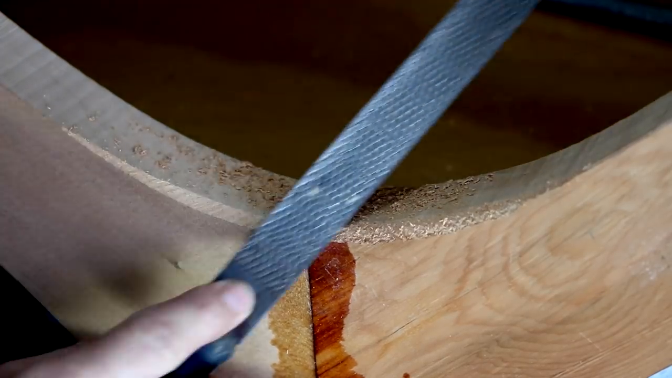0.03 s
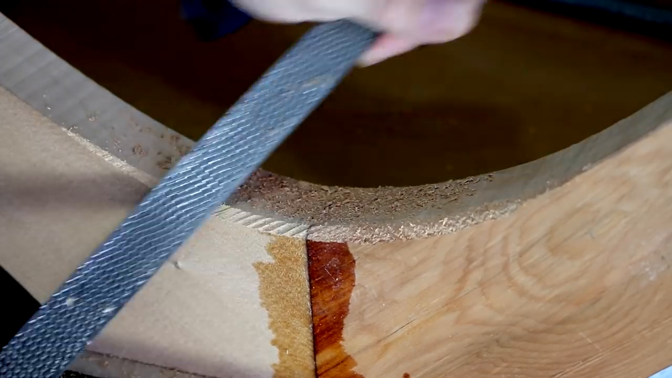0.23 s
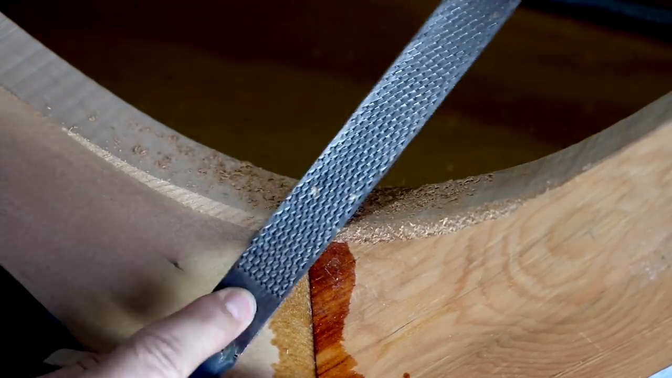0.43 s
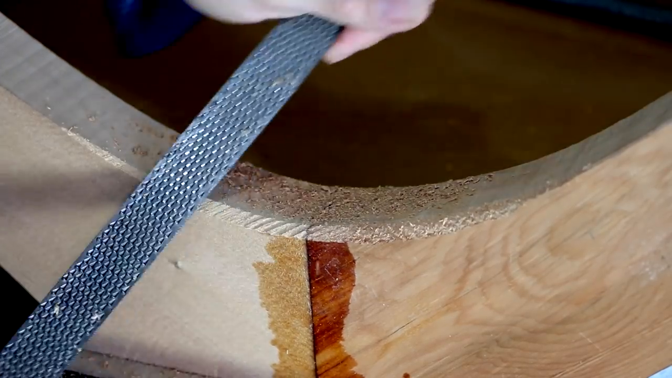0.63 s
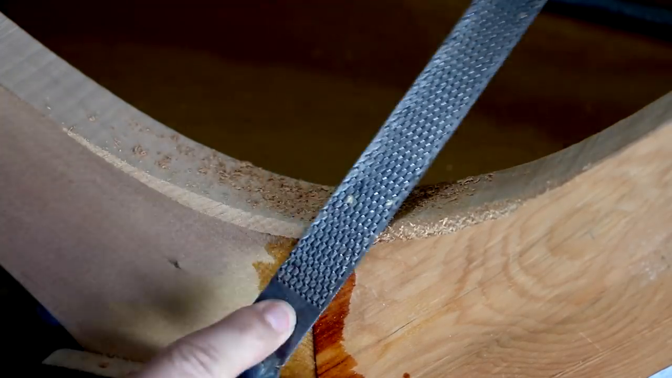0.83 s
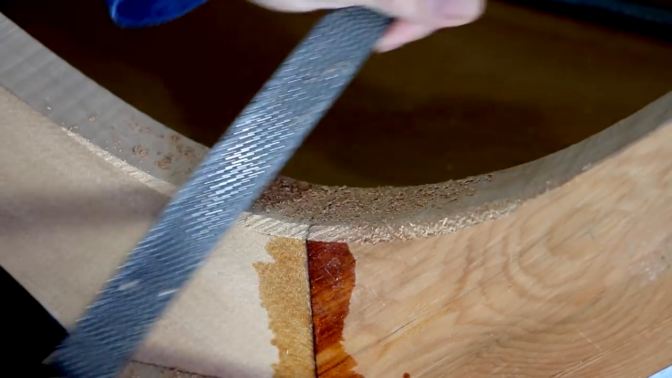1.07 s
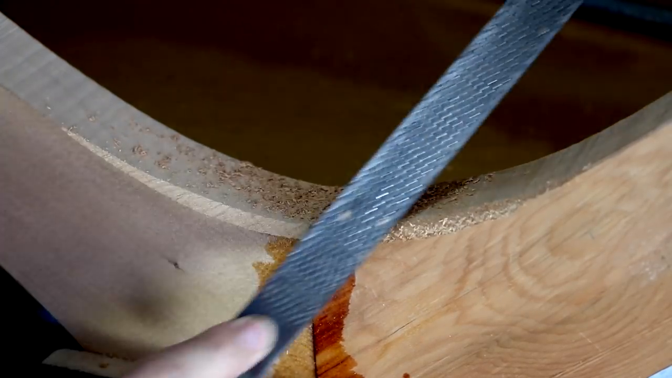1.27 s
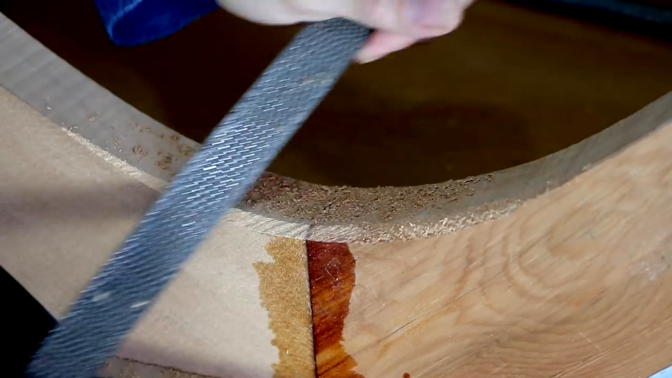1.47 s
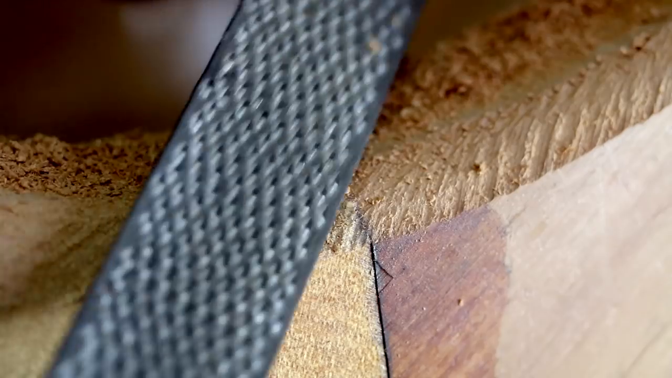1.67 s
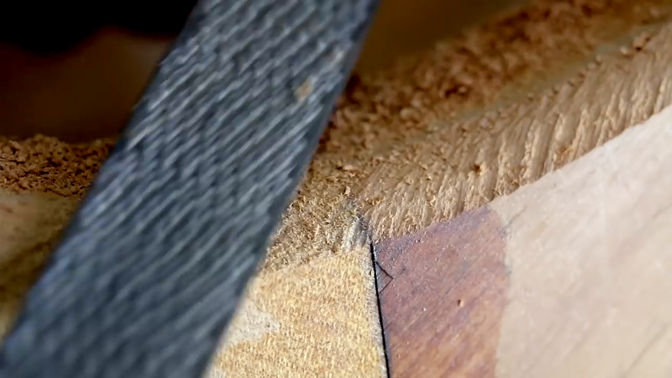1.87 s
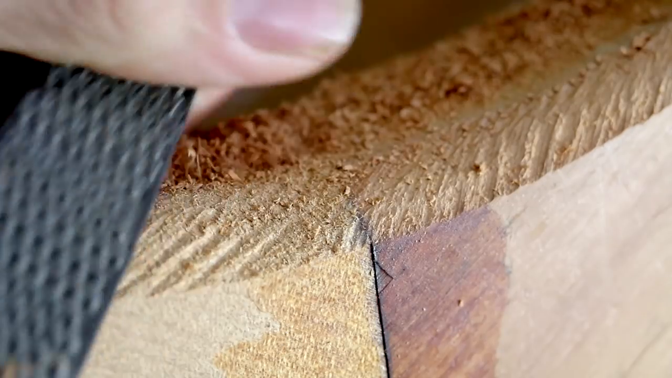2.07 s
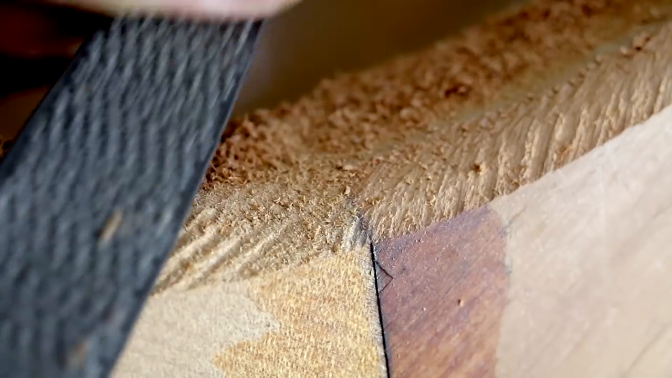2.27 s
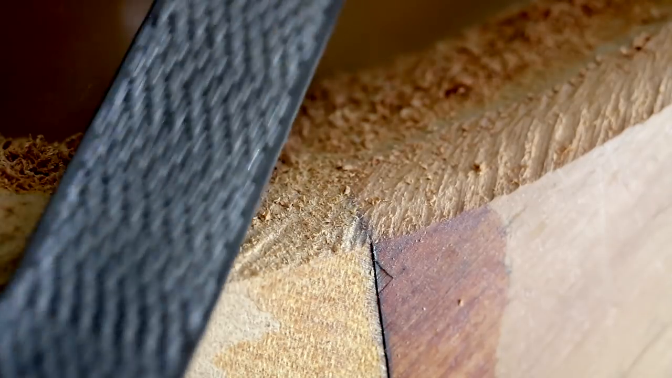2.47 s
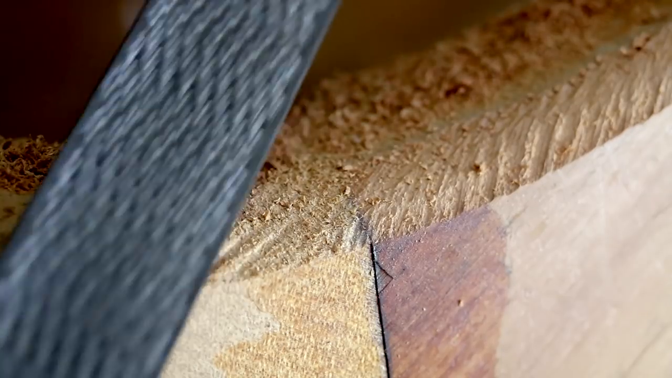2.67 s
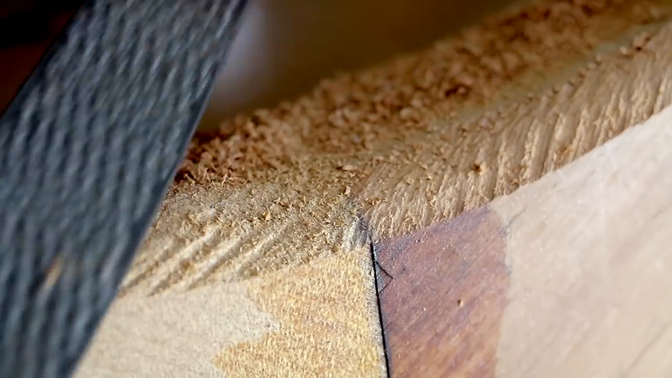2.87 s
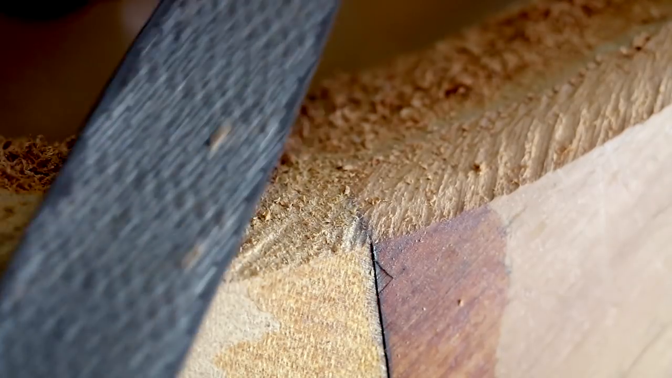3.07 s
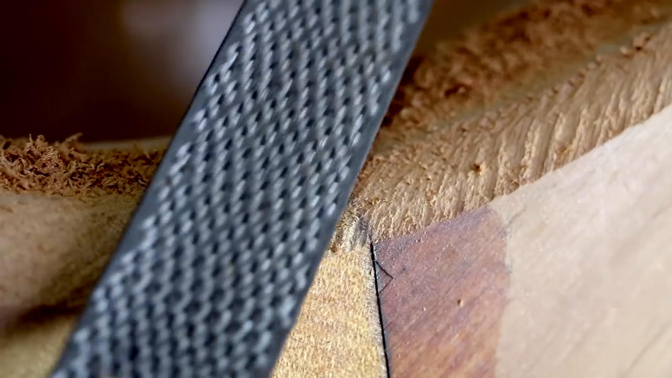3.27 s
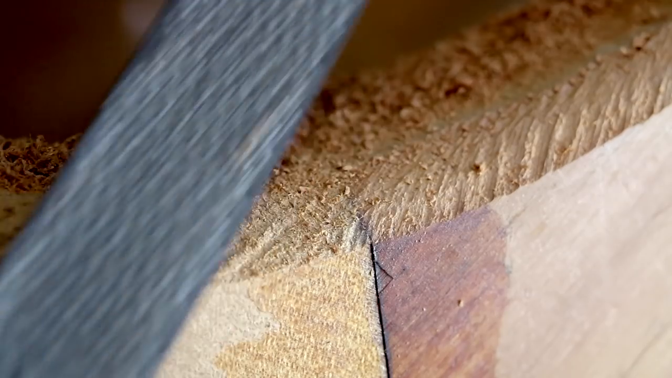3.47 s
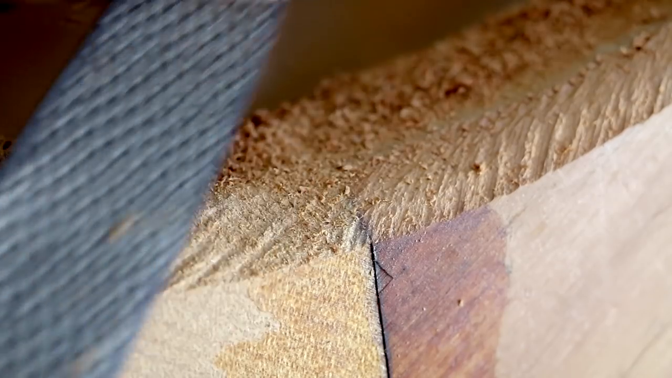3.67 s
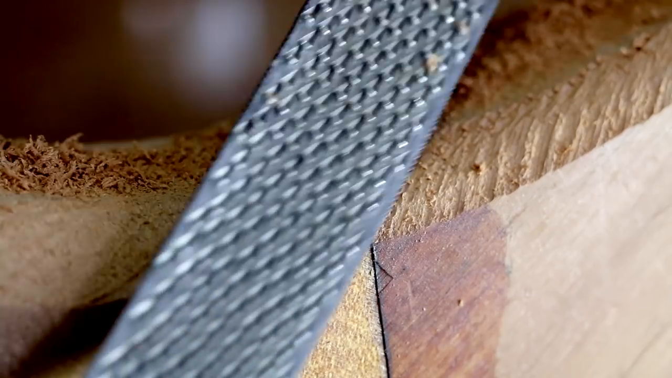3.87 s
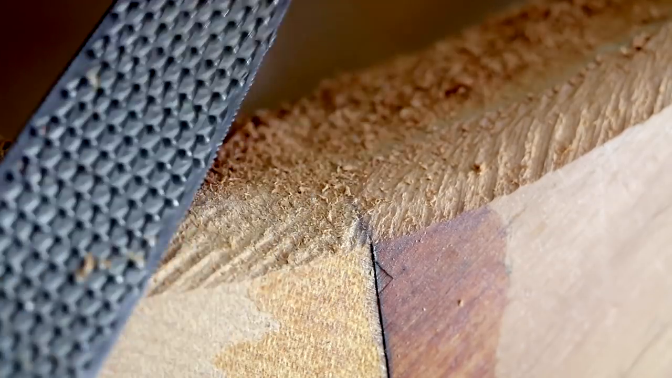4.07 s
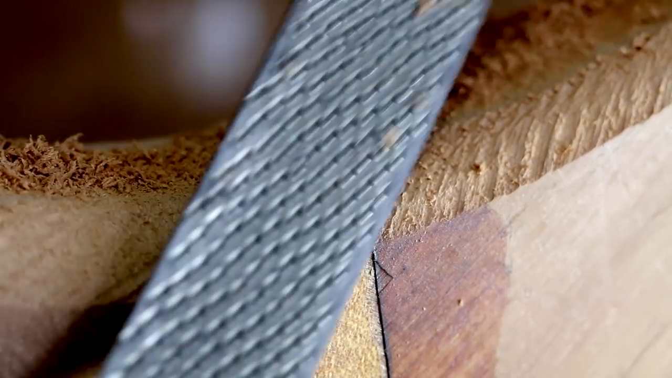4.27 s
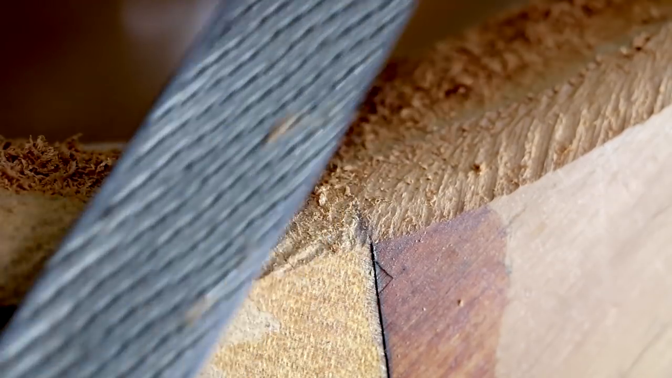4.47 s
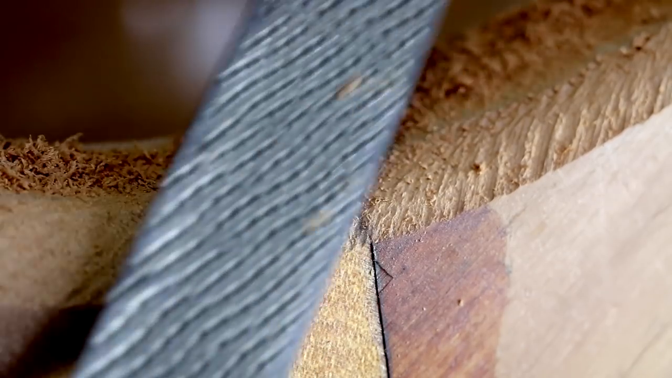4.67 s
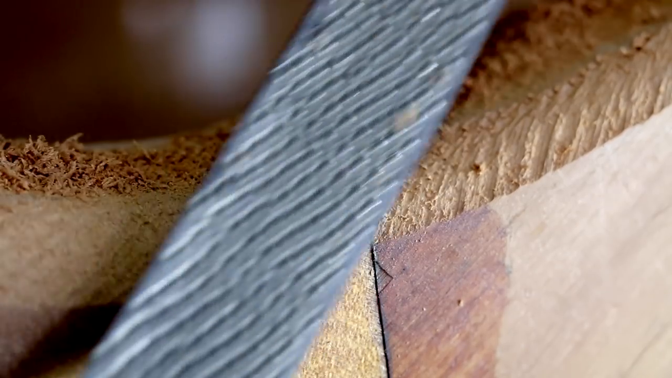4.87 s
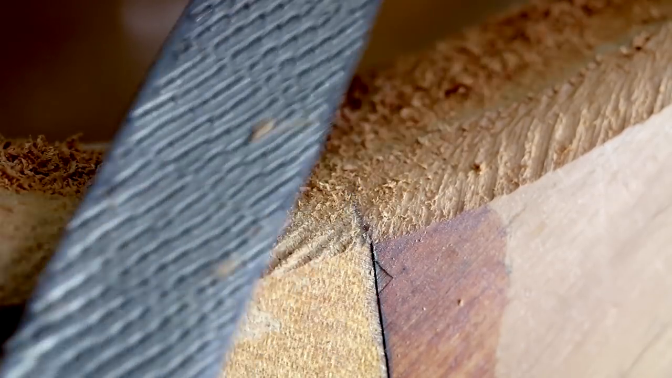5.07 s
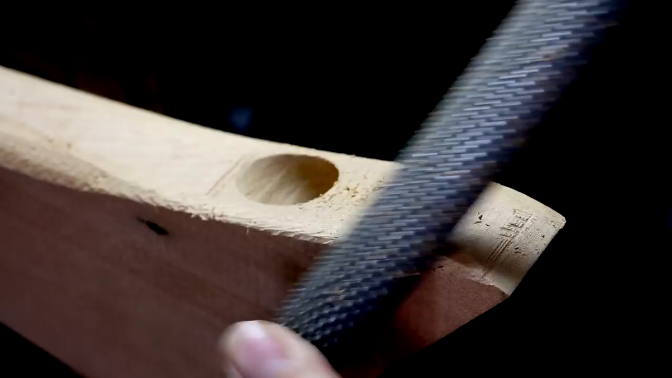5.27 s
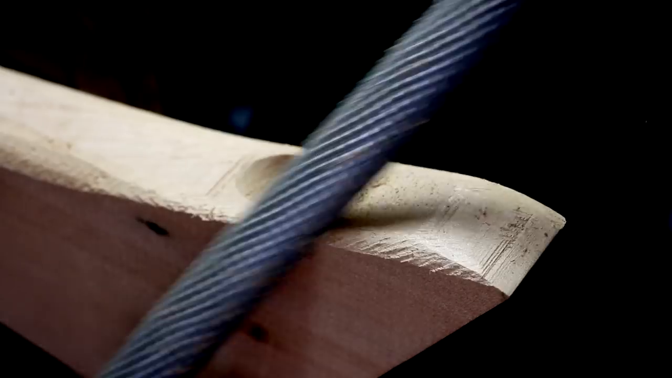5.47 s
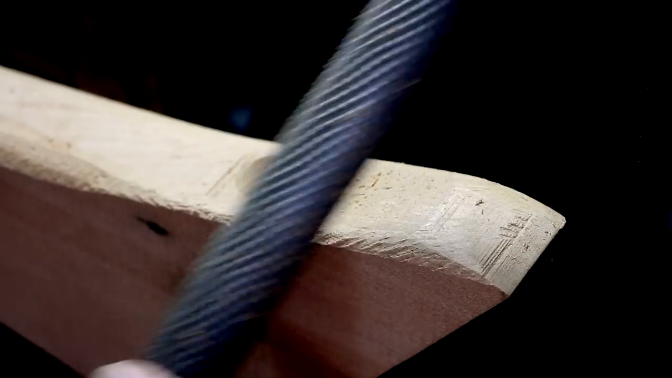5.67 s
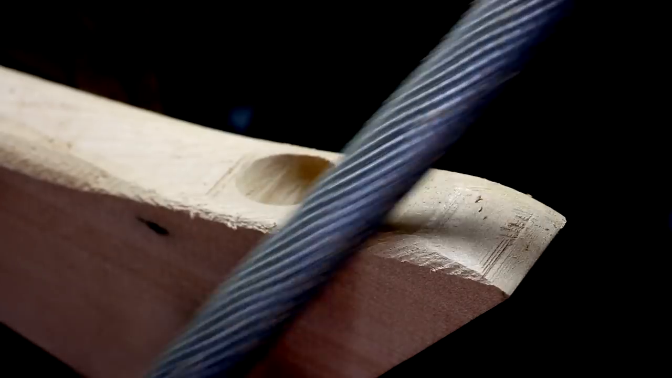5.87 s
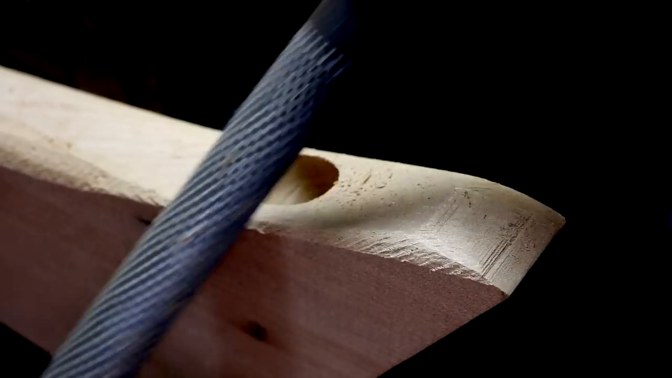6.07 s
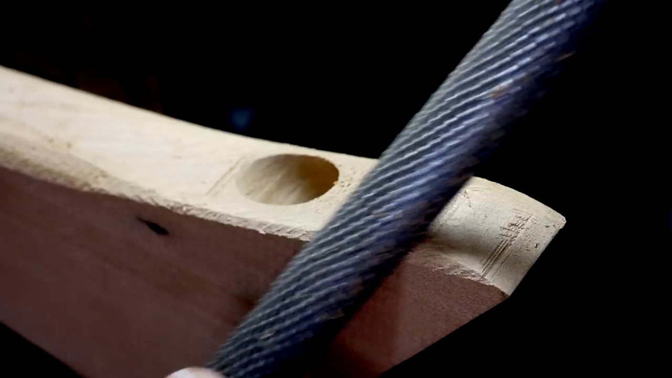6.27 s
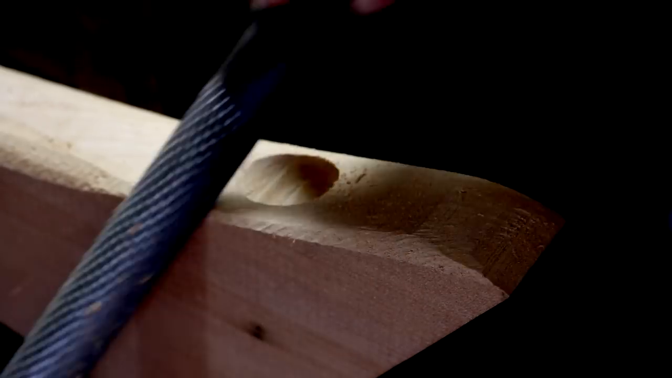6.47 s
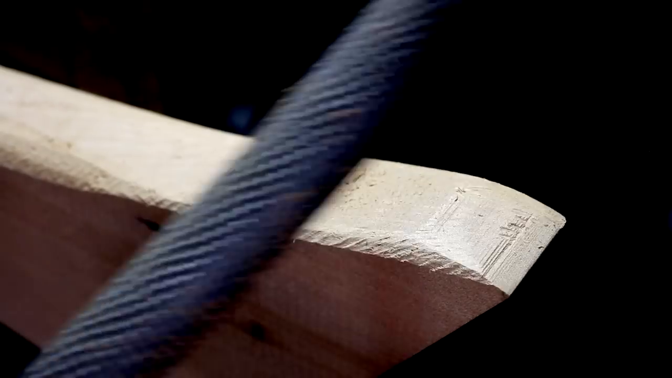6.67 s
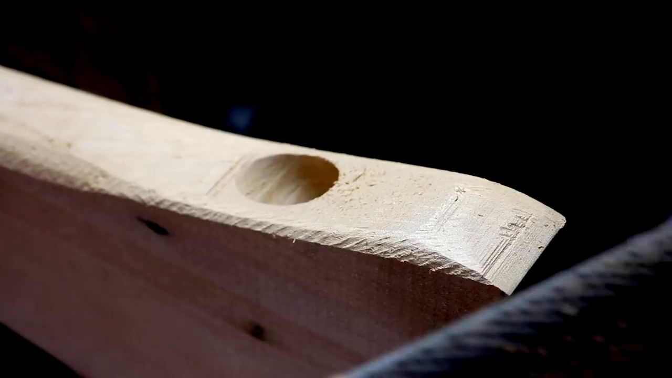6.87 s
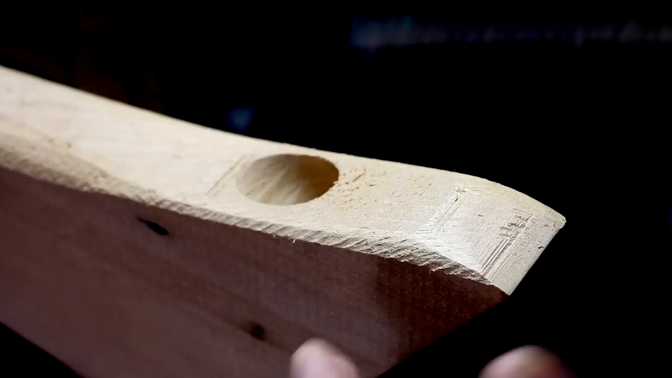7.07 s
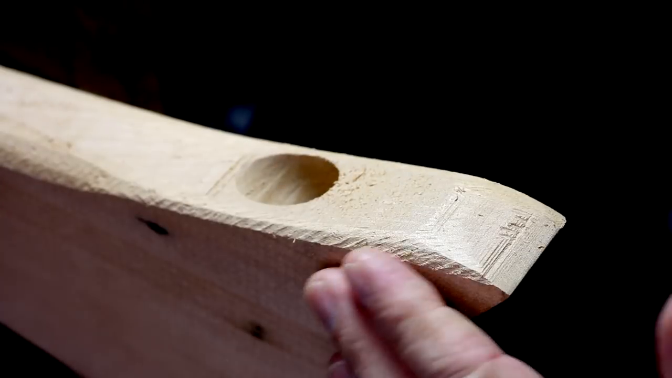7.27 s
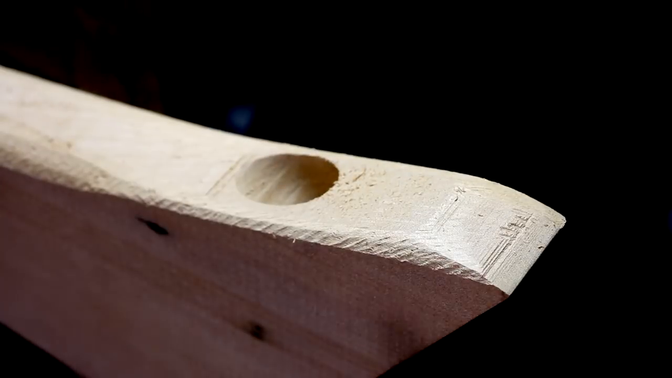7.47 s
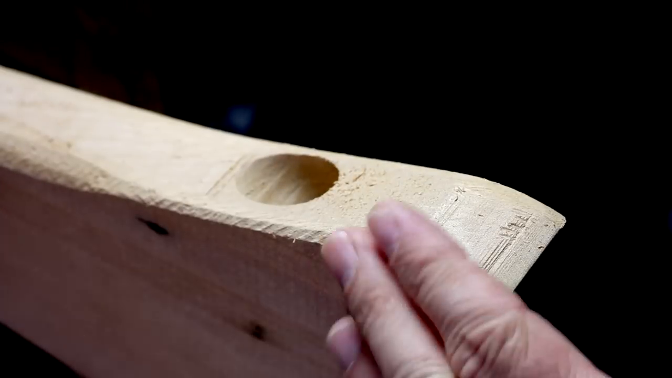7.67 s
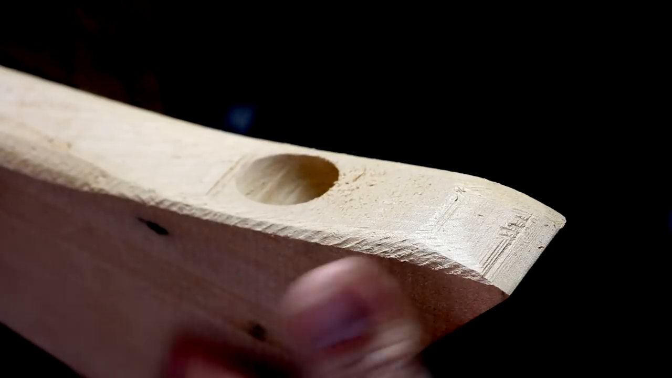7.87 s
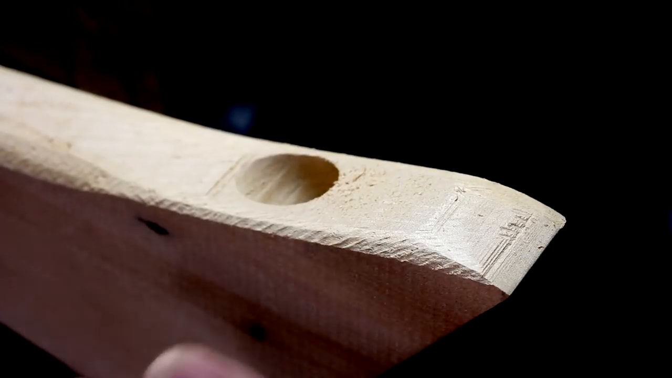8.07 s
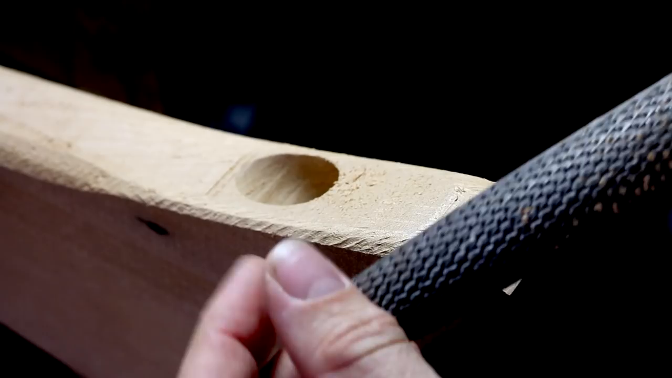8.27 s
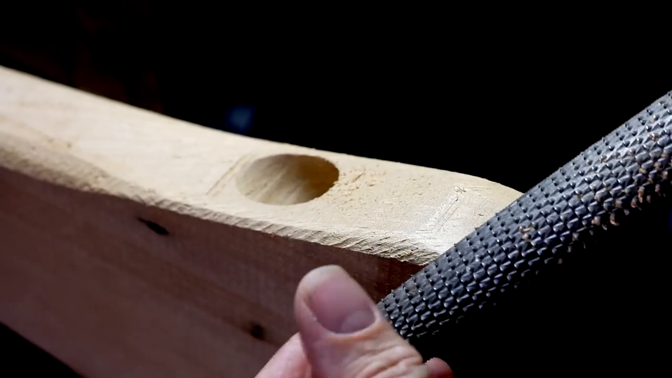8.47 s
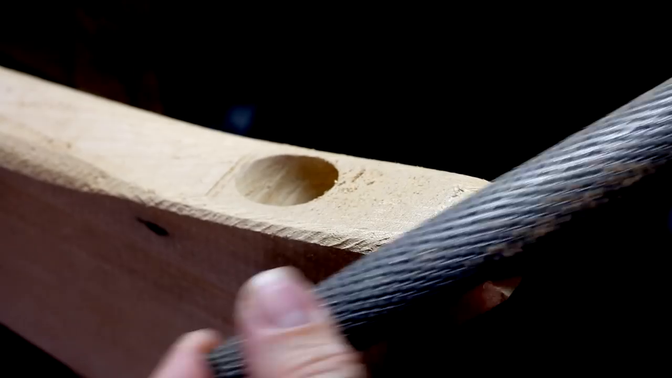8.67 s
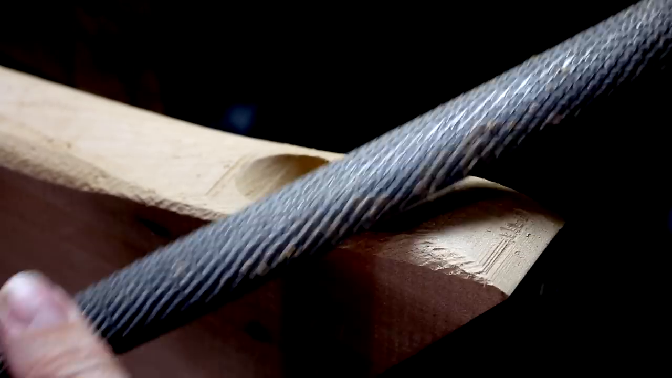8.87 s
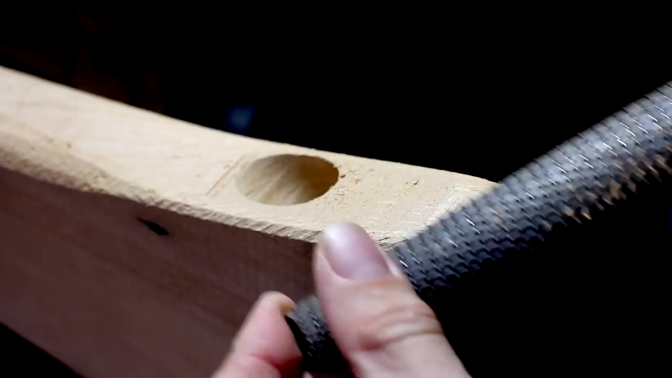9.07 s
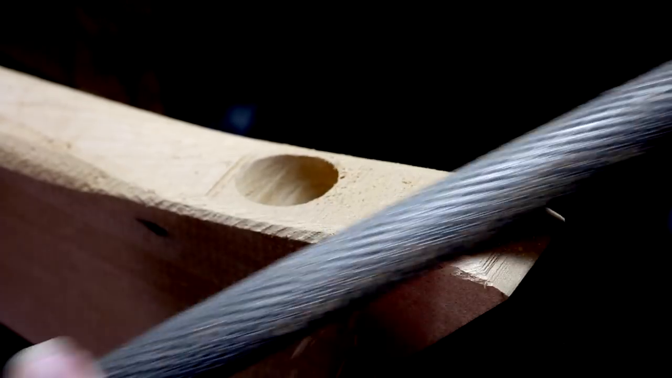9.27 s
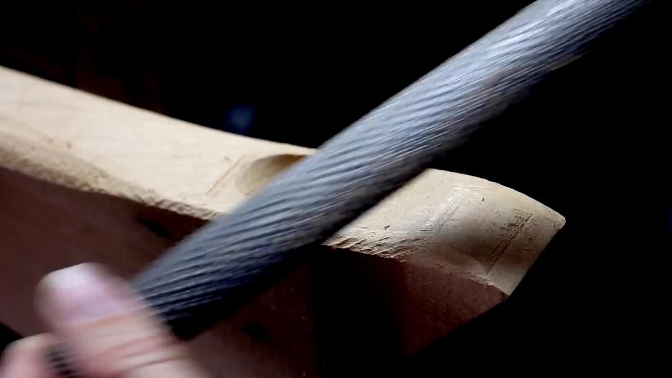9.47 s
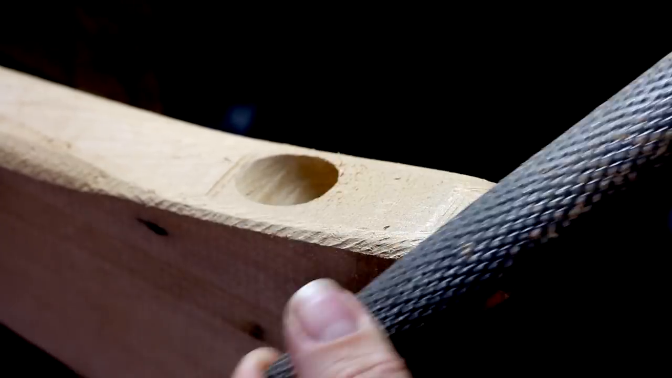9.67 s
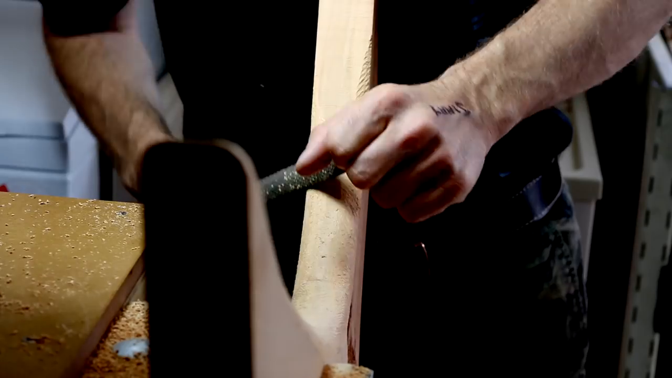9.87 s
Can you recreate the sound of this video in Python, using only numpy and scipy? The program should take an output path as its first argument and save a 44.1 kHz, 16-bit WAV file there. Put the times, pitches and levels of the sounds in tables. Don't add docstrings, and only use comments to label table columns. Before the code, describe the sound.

Dense, uneven scratching of metal teeth on wood, heard by a near camera microphone with faint hiss and a short dull room echo. Brisk back-and-forth strokes come first, with hollow bench rumble underneath, then rougher close ones. Three spaced pushes follow with knocks before them. Fingers brush dust away twice, quietly; two more deep strokes follow, and an abrupt rough scrape ends it.

```python
import sys
import numpy as np
from scipy import signal
from scipy.fft import rfft, irfft, next_fast_len
from scipy.io import wavfile
from scipy.ndimage import uniform_filter1d

SR = 44100
rng = np.random.default_rng(int(sys.argv[2]) if len(sys.argv) > 2 else 0)


def bounce(signal):
    frames = np.transpose(np.atleast_2d(signal))
    limited = np.clip(frames, -1, 1)
    pcm = np.round(limited * 32767).astype(np.int16)
    wavfile.write(sys.argv[1], SR, pcm)


def boost(x):
    u = np.asarray(x, float) / 20
    return 10 ** u


N = 438354

CUTS_S = [0, 1.594, 5.318, 8.45, 9.794, 9.95]
# top_s, swell_20db_s, fade_20db_s, blade_db, bench_above_blade_db
FAR_STROKES = [
    (0.135, 0.123, 0.109, -14.8, -21.2),
    (0.319, 0.097, 0.113, -27.5, -16.2),
    (0.521, 0.126, 0.118, -15.8, -16.7),
    (0.684, 0.074, 0.139, -26.4, -12.8),
    (0.892, 0.109, 0.125, -16.2, -12.5),
    (1.094, 0.103, 0.124, -26.5, -12.2),
    (1.29, 0.104, 0.132, -17.3, -17.1),
    (1.495, 0.076, 0.159, -28.0, -11.6),
]
CLOSE_STROKES = [(1.76, .24, .1, -25, -11), (2.03, .262, .414, -43.1, -9), (2.145, .104, .036, -33.6, -19),
                 (2.58, .254, .131, -21.7, -7), (2.929, .206, .148, -34.9, -17),
                 (3.28, .179, .158, -22.5, -9), (3.658, .195, .114, -34, -17),
                 (3.892, .133, .091, -20.9, -12), (4.114, .156, .129, -35.3, -17),
                 (4.343, .117, .146, -25.5, -10), (4.608, .129, .082, -37, -15),
                 (4.823, .124, .139, -27.1, -12), (5.079, .107, .067, -36.9, -18),
                 (5.283, .129, .26, -26.1, -9)]
# top_s, swell_20db_s, fade_20db_s,
# blade_db, bench_above_blade_db
EDGE_STROKES = [
    (5.32, 0.06, 0.19, -43, 0),
    (5.42, 0.011, 0.034, -32, 8),
    (5.598, 0.14, 0.15, -16, -1),
    (5.9, 0.0075, 0.064, -35.5, 5),
    (6.054, 0.14, 0.15, -15, -6.5),
    (6.34, .006, 0.11, -40, 14),
    (6.517, 0.13, 0.18, -17, -7.5),
]
TIP_STROKES = [
    (8.57, .006, .25, -41, 11),
    (8.895, .185, .16, -18.5, 8.5),
    (9.245, .006, .12, -36, 11),
    (9.44, .178, .15, -17, 3),
    (9.76, .006, .15, -33, 11),
]
UPRIGHT_STROKES = [
    (9.804, .3, 0.18, -17.5, -14.5),
    (9.924, 0.045, .4, -25.5, -6.5),
]
# mode_hz, width_hz, level_db
FAR_MODES = [(79, 15.5, -10), (130.6, 16, -9), (287, 38, -12), (483, 18, 1.5), (975, 36, -4),
             (1034, 180, -8.5), (1317, 147, -7), (1570, 90, -8), (2049, 62, -6), (3004, 180, -17),
             (3108, 240, -17.5), (3840, 490, -22.5), (4560, 67, -27)]
CLOSE_MODES = [(119.4, 3.2, 0), (262.3, 3.6, -8.5), (275, 16, -11), (477, 24, 2.5), (676, 18.5, -6.5),
               (968, 113, -4.5), (1337, 61, -7), (1568.5, 76, 1.5), (2054, 78, -8), (2980, 130, -15.5),
               (3914, 306, -13), (5830, 450, -37), (6480, 670, -35), (7110, 350, -28), (8000, 170, -32.5),
               (8300, 150, -46), (9000, 300, -35), (10370, 840, -35.5), (10570, 270, -42)]
EDGE_MODES = [(82.6, 15, -9.5), (126, 20, -1.5), (248, 19, -2.5), (277, 27, -17), (465, 30, -15.5),
              (715, 59, -18.5), (1124, 88, -19.5), (1738, 200, -19.5), (2296, 47, -24), (2526, 110, -23),
              (3270, 350, -26), (4120, 160, -30.5), (4660, 140, -32.5), (6270, 350, -32.5)]
TIP_MODES = [(81, 38, -12.5), (122.9, 7.1, 7), (253, 20, -18.5), (340, 14, -21), (746, 51, -29),
             (1105, 95, -24), (1696, 95, -15), (2460, 170, -35), (3200, 180, -35), (3810, 400, -33.5),
             (6470, 540, -37)]
UPRIGHT_MODES = [(560, 55, -16), (975, 190, 2.5), (1220, 160, 3.5), (1990, 230, -9), (2970, 980, -16.5),
                 (3970, 250, -13)]
# freq_hz, density_db_per_hz
FAR_WOOD = [(40, -30), (70, -13), (400, -20), (800, -10), (2100, -8), (2500, -21), (4300, -27),
            (5300, -29.5), (7700, -34.5), (8300, -38.5), (15500, -46.5)]
CLOSE_WOOD = [(40, -16.5), (70, -19.5), (345, -14), (730, -4.5), (1700, -8), (2400, -12), (4400, -27),
              (5200, -26.5), (7300, -28), (8100, -36), (15500, -34)]
EDGE_WOOD = [(40, -24), (70, 2), (250, -9), (600, -17), (2600, -19.5), (3000, -29), (5000, -27.5),
             (5400, -34), (7100, -32.5), (7600, -36.5), (15500, -39)]
TIP_WOOD = [(40, -20), (100, -7), (250, -12), (600, -17), (2600, -16.5), (3000, -24), (4400, -26.5),
            (5300, -29.5), (7000, -23), (7500, -35), (15500, -37.5)]
UPRIGHT_WOOD = [(40, -16), (90, -2), (283, -11), (1400, 6), (1600, -5), (4200, -14.5), (5000, -16),
                (15500, -37)]
# small_modes_db, hiss_db
SETUPS = [
    (-6, -47),
    (-8.5, -48),
    (-5, -50.5),
    (-12, -49),
    (-6, -49),
]
CEILINGS = [
    .56,
    .6,
    1.0,
    1.05,
    .6,
]
ARMS = [
    (2.7, 1.3),
    (3.7, 1.6),
    (2, 1),
    (2.8, 1),
    (1.5, 1),
]
HAND = (2.6, 1)
# above_blade_db, swing_share, late_s, top_flatness
FOLLOW = [
    [(1.1, 0.56, 0.041, .9), (-5, 0.82, -0.0059, 0.92), (-17.5, 1.0, -0.000081, 0.72)],
    [(.6, 0.87, 0.028, 0.57), (-2.5, .9, -0.012, 1.53), (-21, 1, -0.0073, .9)],
    [(3, 0.81, 0.023, 1.14), (-2.5, 0.84, 0.0091, 1.15), (-15.5, 1.16, 0.007, 1.16)],
    [(1, 1.15, .003, .7), (-1.5, .92, .002, .9), (-16, 1.3, .001, 1)],
    [(-3.5, 0.81, .005, .95), (-10.5, 0.43, .005, 0.54), (-22, 1.4, 0.0013, 1)],
]
# above_drag_db, swing_share, late_s, top_flatness
DUST = (0.74, 1.56, 0.01, 0.68)
# start_s,
# peak_db, pitch_hz, width_hz
TICKS = [(0.372, -27, 9000, 12000), (2.17, -34, 9000, 9000), (2.19, -31, 9000, 9000),
         (2.21, -37.5, 469, 19), (2.303, -27.5, 457, 40), (2.33, -21, 455, 44), (2.58, -15.5, 479, 47),
         (2.61, -12.5, 480, 50), (3.088, -31, 472, 48), (3.107, -26, 481, 40), (3.519, -30, 1570, 300),
         (4.712, -30, 1570, 280), (5.166, -25, 477, 52), (5.67, -35, 465, 7.5), (6.14, -33, 465, 12),
         (6.489, -9.5, 253, 8.5), (6.599, -28.5, 465, 7.4), (9.441, -18, 1716, 11.3),
         (9.501, -35.5, 465, 8.2), (7.154, -40, 2800, 1200), (7.226, -32, 6000, 14000),
         (7.323, -36, 1990, 1800), (7.662, -31.5, 4500, 5200), (9.7934, -15, 9000, 20000)]
# start_s, peak_db, contact_ms
KNOCKS = [
    (5.408, -8.5, 0.6),
    (5.887, -13, 0.82),
    (6.328, -13.5, 0.55),
    (8.553, -15.5, 0.78),
    (9.233, -19.5, 1),
    (9.746, -23.5, 1),
]
# mode_hz, level_db, t60_s
LANDING = [(81.5, -4, 0.31), (113.4, -17, 0.52), (195, -2, 0.072), (258.6, 1.5, 0.14), (322.4, 2.5, 0.094),
           (452, 2.5, 0.06), (636, 2, 0.042), (740, -5, 0.4), (863, -1.5, 0.037), (1066, 12.5, 0.0096),
           (1674, 14, 0.018), (2360, -14.5, .03), (3300, -20, .1)]
# top_s, swell_20db_s, fade_20db_s, drag_db, dust_above_drag_db
WIPES = [
    (6.9, .2, .25, -61, 3),
    (7.379, .107, .219, -52.5, -3),
    (7.51, .125, .119, -44, 5),
    (8.002, .204, .16, -44, 5),
    (8.2, .1, .5, -62, 0),
]
# freq_hz, density_db_per_hz
SKIN = [(180, -61.5), (300, -29), (455, -0.5), (762, -11), (1750, 1), (3580, 7.5), (16000, 4)]
# freq_hz, density_db_per_hz
SHOP = [(12, -36.5), (20, -1.5), (74, 11), (216, -9), (347, -3), (388, -9), (678, -15.5), (949, -11.5),
        (1610, -17), (7110, -24.5), (16000, -26)]

BENCH_HZ, LEG_HZ, BLADE_HZ, TOP_HZ = 180, 600, 5000, 16500
SHOP_T60_S, ECHO_DB = 0.11, -15


def unit(x):
    return x / np.sqrt(np.mean(x ** 2))


def colour(x, response):
    size = next_fast_len(len(x) + SR // 2)
    f = np.fft.rfftfreq(size, 1 / SR) + 0.0011
    return irfft(rfft(x, size) * response(f), size)[:len(x)]


def smooth(points):
    hz, db = np.transpose(points)
    return lambda f: boost(np.interp(np.log(f), np.log(hz), db))


def ringing(modes, order=1):
    def response(f):
        total = 0
        for k, (hz, width_hz, db) in enumerate(modes):
            damping = 1j * f * width_hz
            total = total + (-1) ** k * boost(db) * (damping / (hz ** 2 - f ** 2 + damping)) ** order
        return total
    return response


def between(low_hz, high_hz):
    return lambda f: 1 / (1 + (f / high_hz) ** 8) - 1 / (1 + (f / low_hz) ** 8)


def walk(size, rate):
    hold = int(SR / rate)
    levels = np.repeat(rng.standard_normal(size // hold + 1), hold)
    slewed = uniform_filter1d(uniform_filter1d(levels, hold), hold)
    return unit(slewed[:size])


def add(track, s, sound, peak_db):
    i = int(s * SR)
    track[i:i + len(sound)] += (sound * boost(peak_db) / np.abs(sound).max())[:N - i]


def bites(size, rate, spread_db, chatter_db, chatter_rate):
    hit = rng.random(size) < rate / SR
    force = np.minimum(rng.exponential(size=size), 4)
    sign = rng.standard_normal(size)
    chatter = boost(chatter_db * walk(size, chatter_rate))
    return unit(hit * boost(spread_db * force) * sign * chatter)


def played(t, strokes, arm, above_db=0, swing=1, late_s=0, flat=1, own=False):
    power, coarse = 0, t[::32]
    for s, swell_s, fade_s, db, own_db in strokes:
        away = coarse - s - late_s
        span_s = np.where(away < 0, swell_s, fade_s)
        curve = flat * np.where(away < 0, *arm)
        drop_db = 20 * np.abs(away / span_s) ** curve
        power = power + boost(db + above_db + own * own_db - swing * drop_db) ** 2
    return np.interp(t, coarse, np.sqrt(power))


def room_tone():
    return unit(colour(rng.standard_normal(N), smooth(SHOP))) * boost(1.0 * walk(N, 2.5))


def bench_sway(t, teeth, strokes, modes, wood, wood_db, arm, law):
    def bench(f):
        return (ringing(modes)(f) + boost(wood_db) * smooth(wood)(f)) * between(1, BENCH_HZ)(f)
    sway = colour(teeth, bench)
    steady = sway / np.sqrt(uniform_filter1d(sway ** 2, size=SR // 12))
    return steady * played(t, strokes, arm, *law, own=True)


def rasp_band(teeth, fibres, slide, gain, modes, wood, wood_db, low_hz, high_hz):
    order = 2 if low_hz >= LEG_HZ else 1

    def ring(some):
        return lambda f: ringing(some, order)(f) * between(low_hz, high_hz)(f)

    def fill(f):
        return boost(wood_db) * smooth(wood)(f) * between(low_hz, high_hz)(f)

    f = np.linspace(1, SR / 2, 8000)
    force = gain / np.sqrt(np.mean(np.abs(ring(modes)(f)) ** 2 + fill(f) ** 2))
    even = colour(teeth * force * slide, ring(modes[::2]))
    odd = colour(teeth * force / slide, ring(modes[1::2]))
    return even - odd + colour((0.65 * fibres + 0.5 * teeth) * force, fill)


def rasp(t, strokes, modes, wood, wood_db, arm, follow):
    teeth = bites(len(t), 5000, 2.52, 1.14, 90)
    fibres = bites(len(t), 5000, 2.07, 3.5, 34.36)
    slide = boost(1.7 * walk(len(t), 40.09))
    bench_law, leg_law, fibre_law = follow
    out = bench_sway(t, teeth, strokes, modes, wood, wood_db, arm, bench_law)
    bands = [(leg_law, BENCH_HZ, LEG_HZ), ((), LEG_HZ, BLADE_HZ), (fibre_law, BLADE_HZ, TOP_HZ)]
    for law, low_hz, high_hz in bands:
        gain = played(t, strokes, arm, *law)
        out = out + rasp_band(teeth, fibres, slide, gain, modes, wood, wood_db, low_hz, high_hz)
    return out


def workshop_answer():
    t = np.arange(SR // 2) / SR
    tail = rng.standard_normal(len(t)) * boost(-60 * t / SHOP_T60_S) * (t > .006)
    dull = colour(tail, lambda f: 1 / (1 + (f / 5000) ** 2) / (1 + (200 / f) ** 2))
    return unit(dull) / np.sqrt(len(t))


def ticks():
    out = np.zeros(N)
    impulse = np.eye(1, SR // 3)[0]
    for s, db, hz, width_hz in TICKS:
        add(out, s, colour(impulse, ringing([(hz, width_hz, 0)], order=2)), db)
    return out


def knocks():
    out = np.zeros(N)
    modes = [(hz, np.log(1000) / np.pi / t60, db + 20 * np.log10(t60)) for hz, db, t60 in LANDING]

    def dull(f):
        return ringing([(1500, 2500, 0)])(f) / (1 + 1j * f / 3500) ** 4

    for s, db, contact_ms in KNOCKS:
        push = np.zeros(SR // 4)
        first_s, second_s = 0.00996 + 0.0028 * rng.random(), 0.026 + 0.0077 * rng.random()
        for at, share in ((0, 1), (first_s, .3), (second_s, .4)):
            width = int(contact_ms * (1 + 80 * at) * SR / 1000) + 3
            add(push, at, np.hanning(width), 20 * np.log10(share))
        crack = rng.standard_normal(len(push)) * np.exp(-np.arange(len(push)) / (0.0037 * SR))
        blow = unit(colour(push, ringing(modes))) + .2 * unit(colour(crack, dull))
        add(out, s + 1 / 400, blow, db)
    return out


def wiping_fingers(t):
    dust = bites(N, 16000, 0.59, 0.37, 50)

    def drag(f):
        return (smooth(SKIN)(f) + ringing([(1715, 60, 6), (3600, 300, 3)])(f)) * between(1, BLADE_HZ)(f)

    def hiss(f):
        return smooth(SKIN)(f) * between(BLADE_HZ, TOP_HZ)(f)

    dragging = unit(colour(dust, drag)) * played(t, WIPES, HAND)
    hissing = unit(colour(dust, hiss)) * played(t, WIPES, HAND, *DUST, own=True)
    return dragging + hissing


def scene():
    t, out = np.arange(N) / SR, np.zeros(N)
    tone, answer = room_tone(), workshop_answer()
    small = ticks() + knocks() + wiping_fingers(t)
    work = [(FAR_STROKES, FAR_MODES, FAR_WOOD),
            (CLOSE_STROKES, CLOSE_MODES, CLOSE_WOOD),
            (EDGE_STROKES, EDGE_MODES, EDGE_WOOD),
            (TIP_STROKES, TIP_MODES, TIP_WOOD),
            (UPRIGHT_STROKES, UPRIGHT_MODES, UPRIGHT_WOOD)]
    for k, (strokes, modes, wood) in enumerate(work):
        wood_db, hiss_db = SETUPS[k]
        here = (t >= CUTS_S[k]) & (t < CUTS_S[k + 1])
        near = rasp(t[here], strokes, modes, wood, wood_db, ARMS[k], FOLLOW[k]) + small[here]
        echo = boost(ECHO_DB) * signal.fftconvolve(near, answer)[:len(near)]
        heard = near + echo + boost(hiss_db) * tone[here]
        out[here] = heard / (1 + (heard / CEILINGS[k]) ** 6) ** (1 / 6)
    return out[None]


def roll_off(x):
    return signal.sosfilt(signal.butter(12, 16650, fs=SR, output="sos"), x)


def record(dry):
    top_cut = signal.ellip(10, .1, 60, 15750, fs=SR, output="sos")
    kept = signal.sosfilt(top_cut, dry)
    return roll_off(kept)


dry = scene()
out = record(dry)
bounce(out)
```